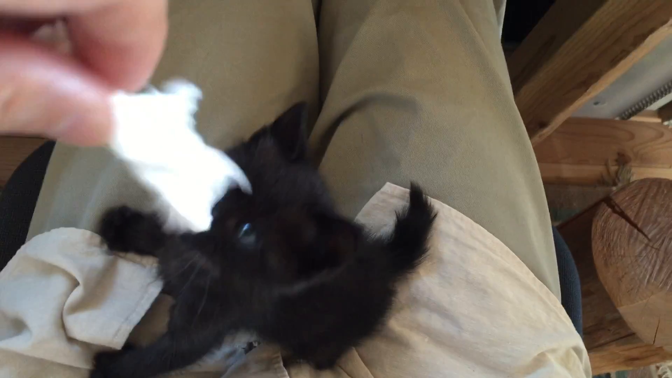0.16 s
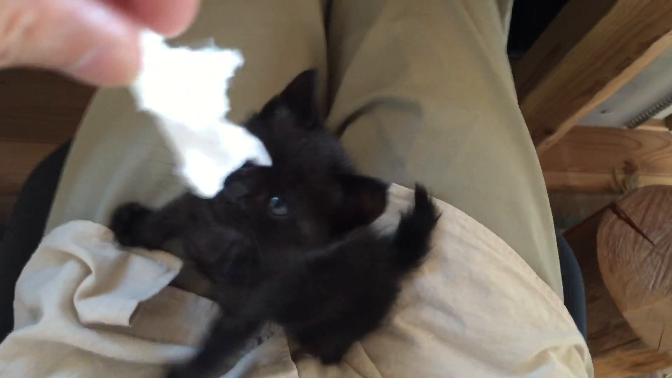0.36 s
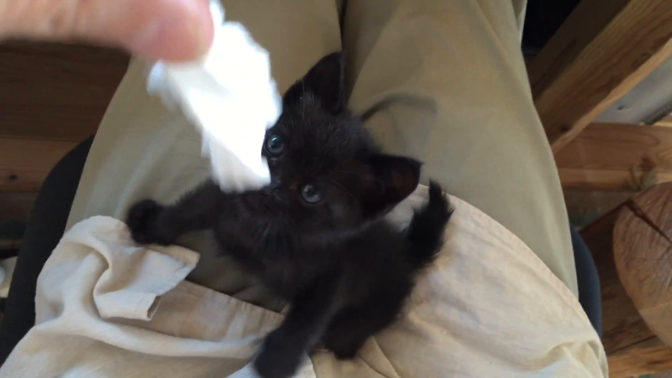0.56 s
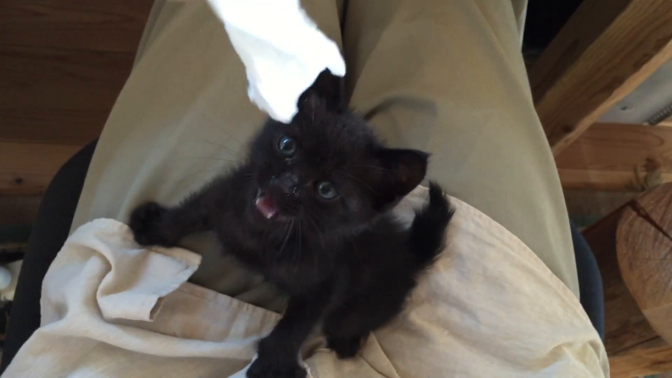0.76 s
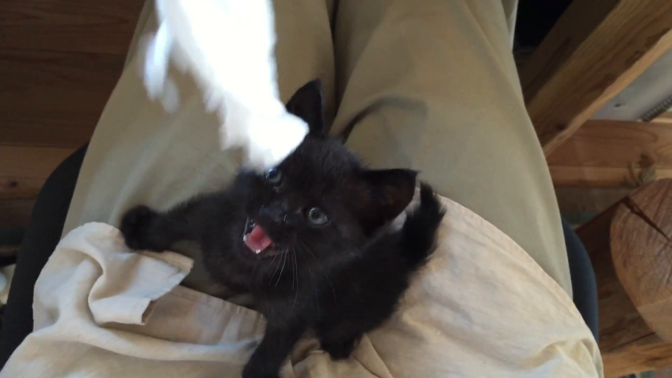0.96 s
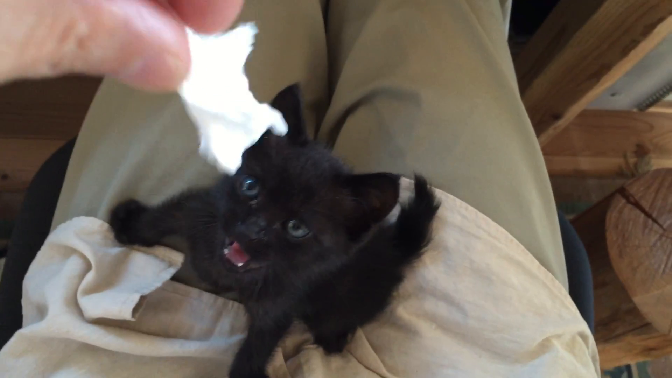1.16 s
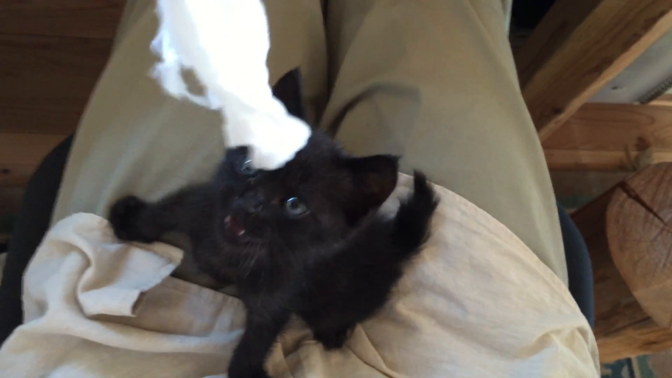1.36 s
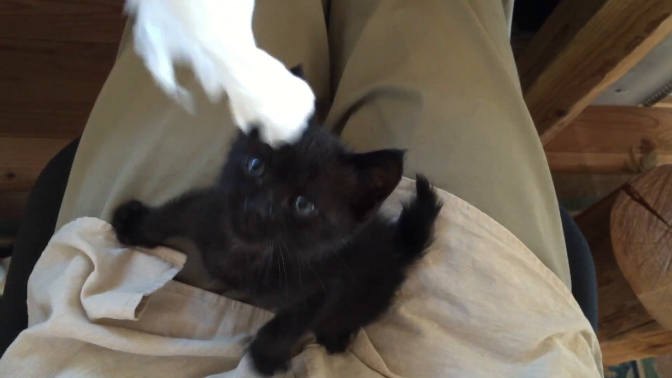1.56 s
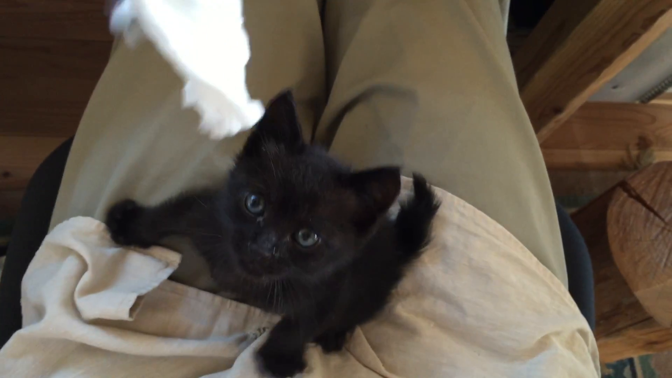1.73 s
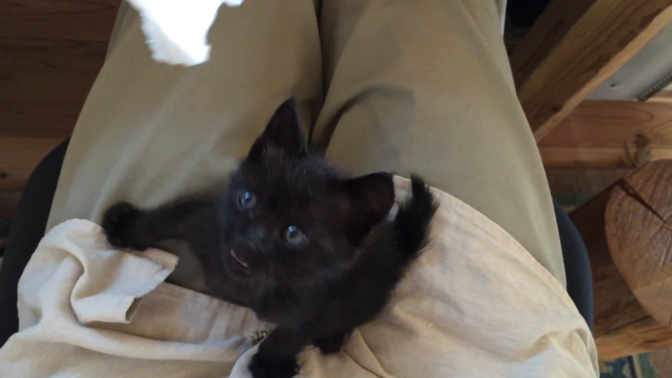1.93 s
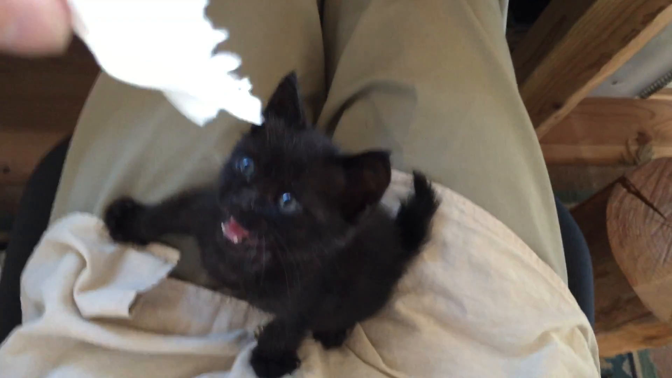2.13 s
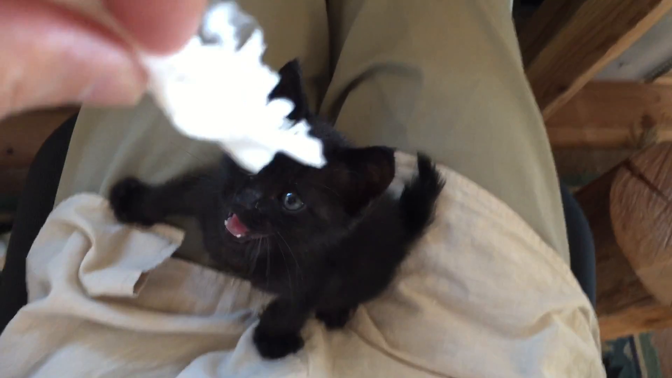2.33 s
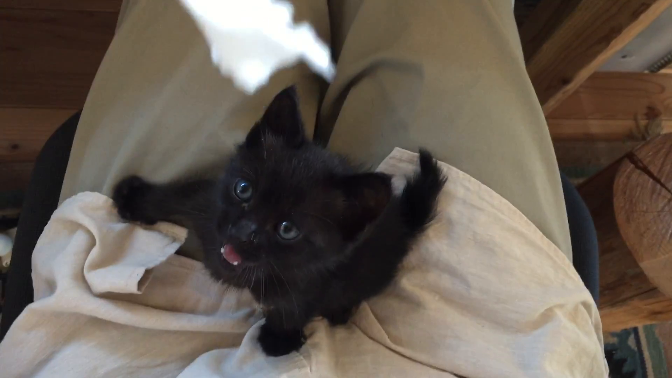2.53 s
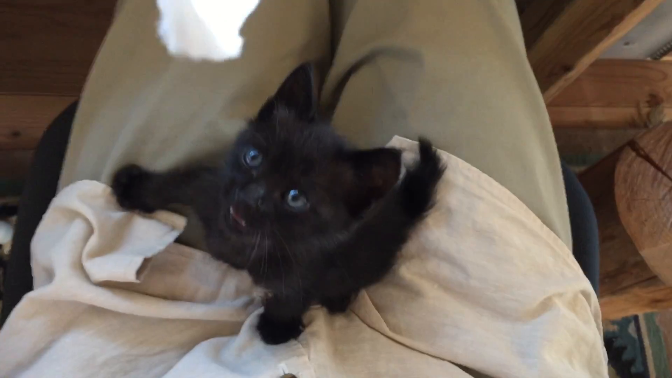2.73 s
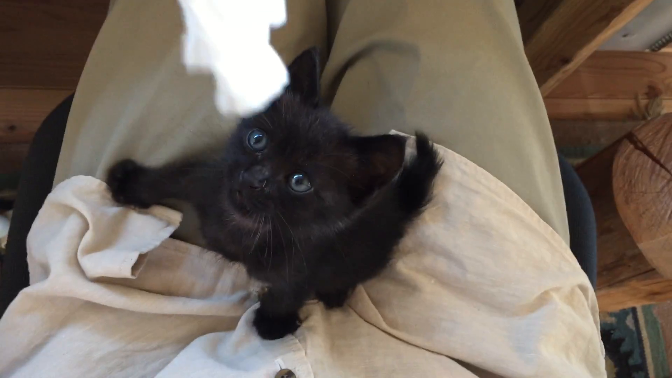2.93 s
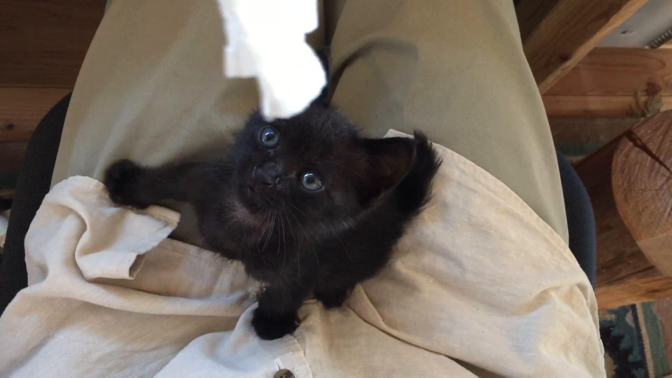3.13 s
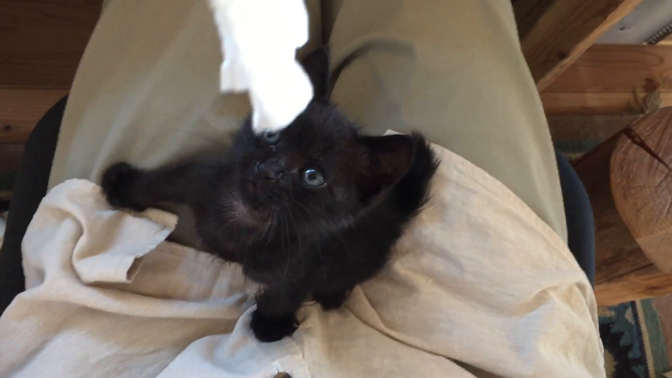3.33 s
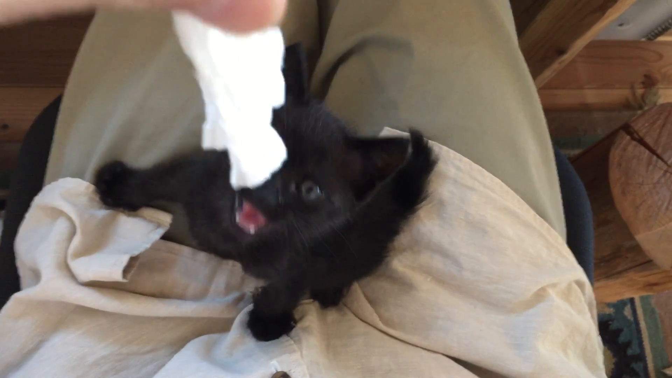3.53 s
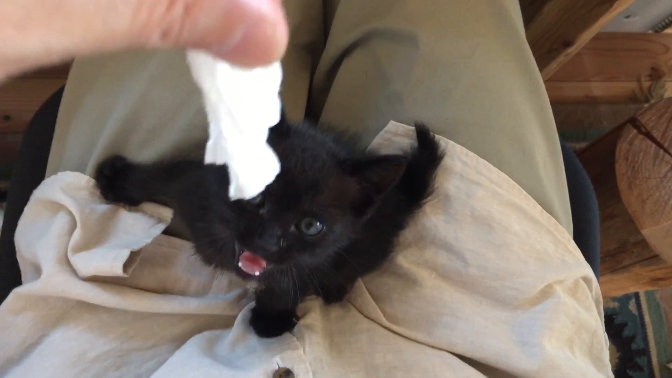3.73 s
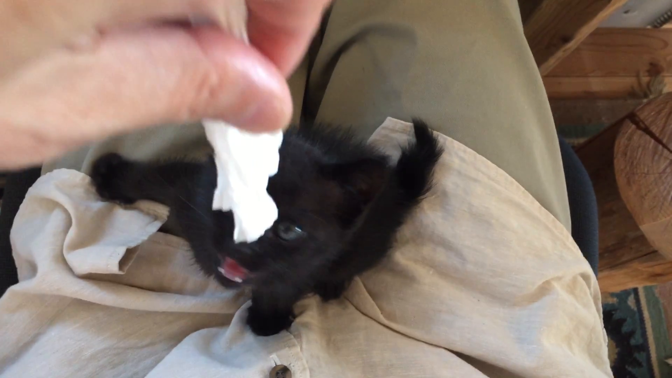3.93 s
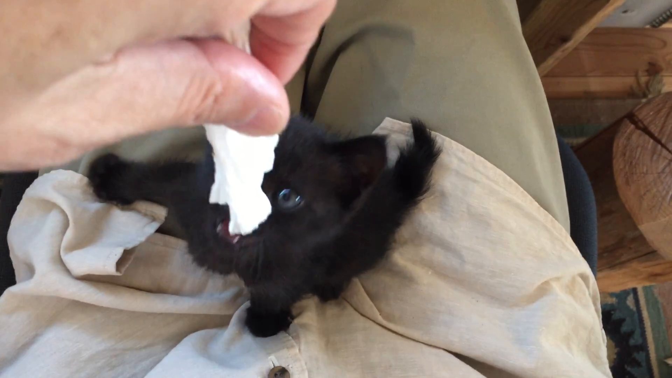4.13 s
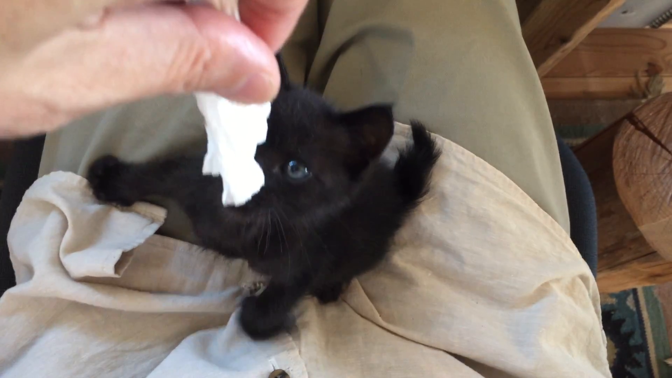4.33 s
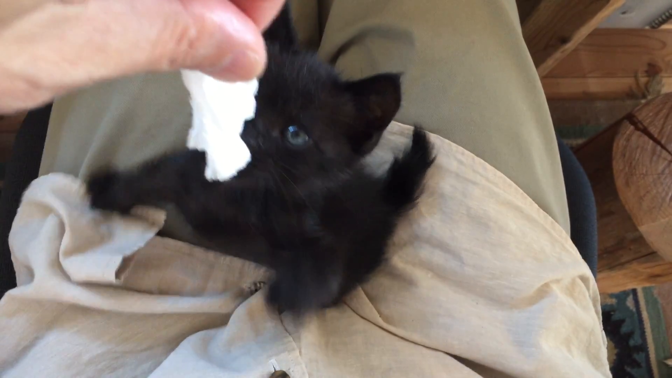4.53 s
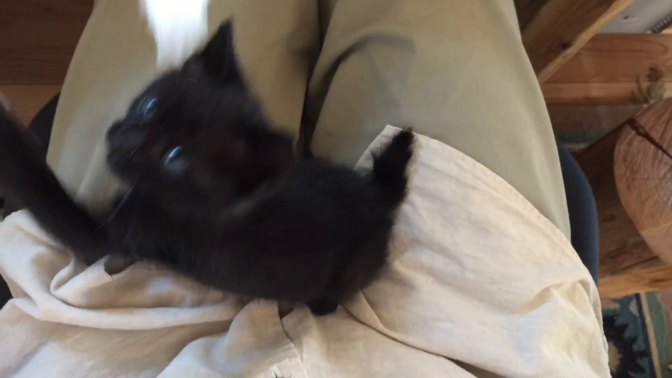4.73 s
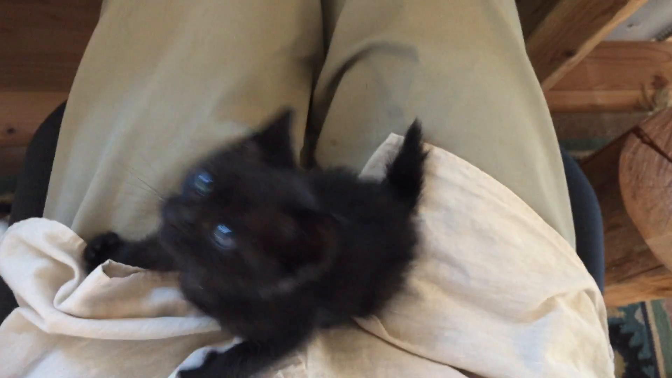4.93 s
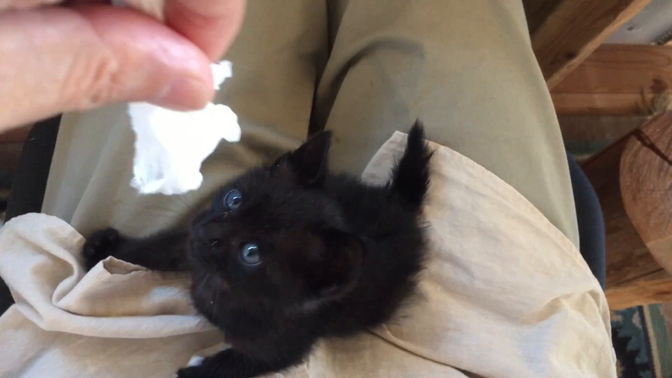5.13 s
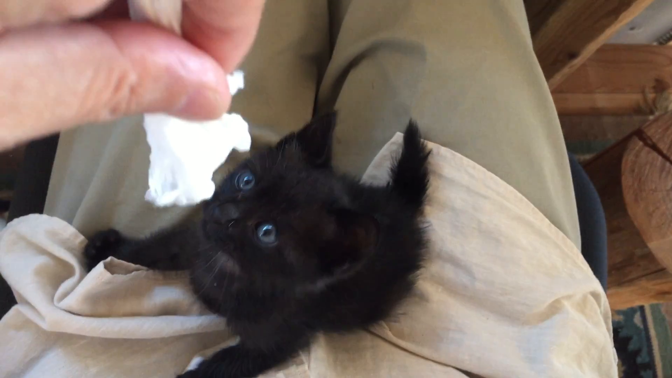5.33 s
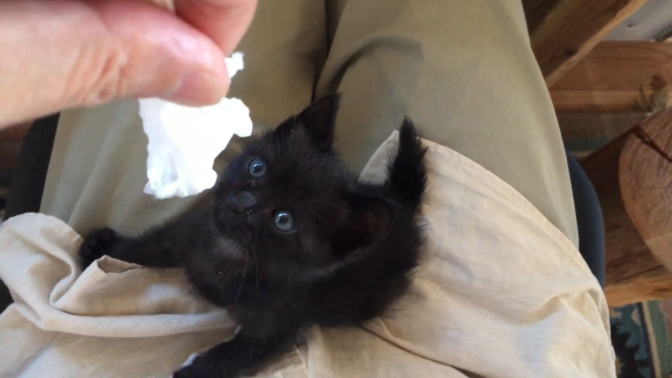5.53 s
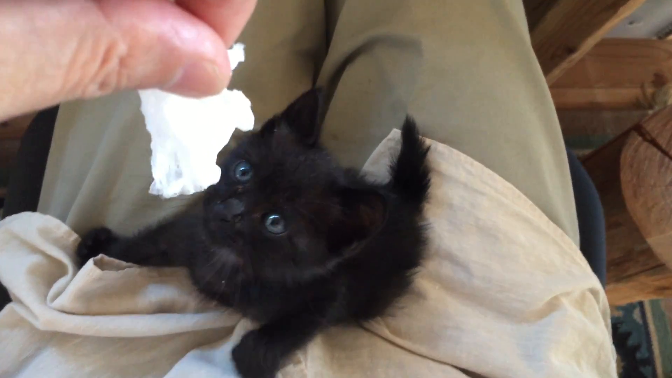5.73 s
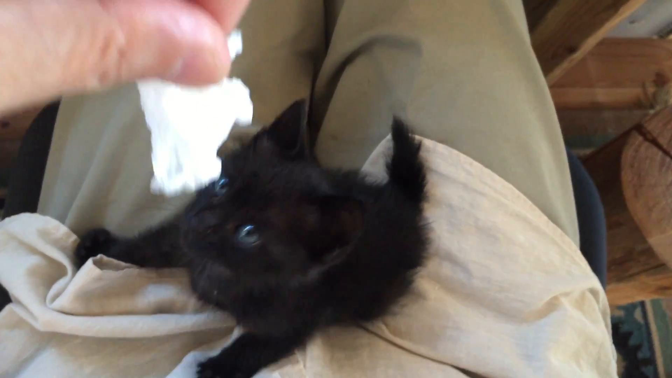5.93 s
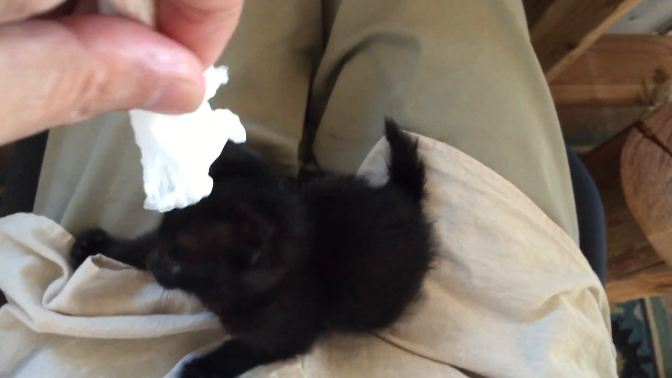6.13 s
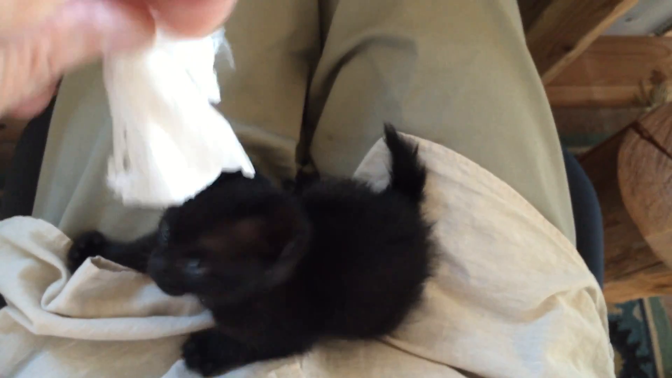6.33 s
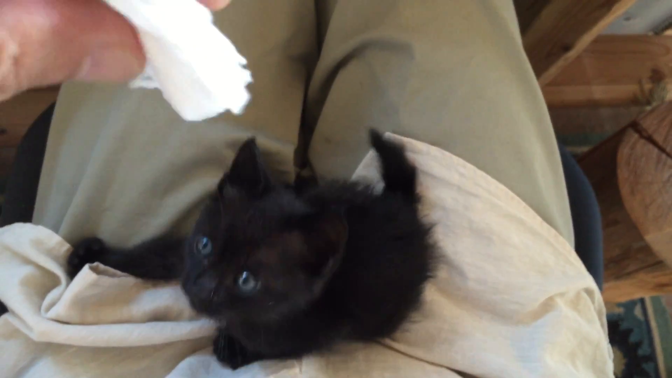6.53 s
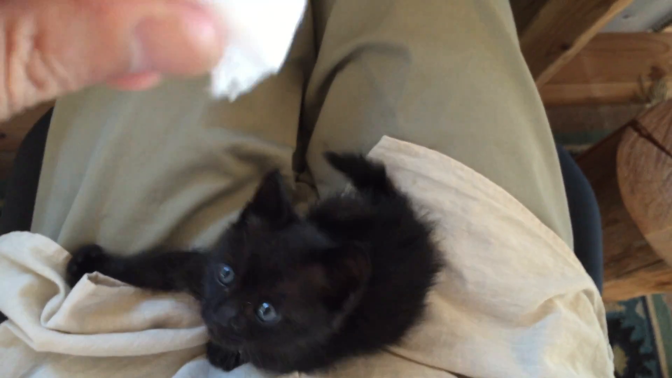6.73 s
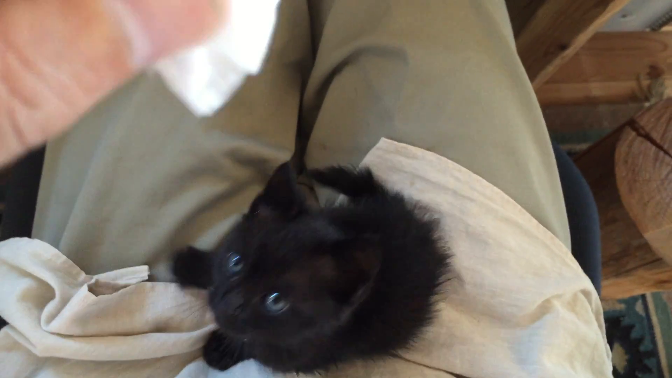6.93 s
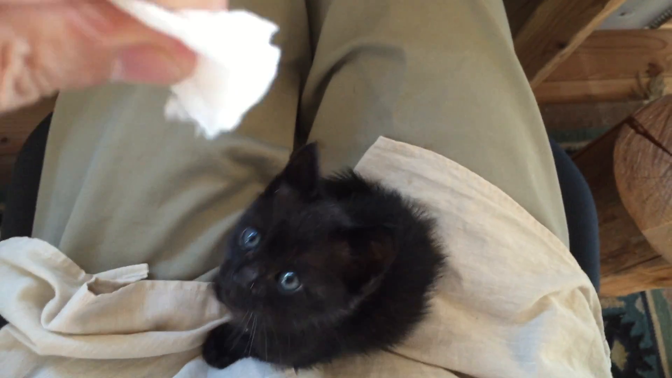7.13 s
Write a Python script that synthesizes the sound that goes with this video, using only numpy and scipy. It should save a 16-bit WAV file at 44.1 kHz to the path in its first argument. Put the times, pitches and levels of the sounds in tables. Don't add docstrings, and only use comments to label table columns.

```python
import sys
import numpy as np
from scipy import signal
from scipy.fft import rfft, irfft
from scipy.io import wavfile
from scipy.ndimage import uniform_filter1d, minimum_filter1d

SR = 44100
rng = np.random.default_rng(int(sys.argv[2]) if len(sys.argv) > 2 else 0)


def pcm_store(signal):
    levels = np.round(np.clip(np.atleast_2d(signal), -1, 1) * 32767)
    wavfile.write(sys.argv[1], SR, levels.astype(np.int16).T)


def voltage_ratio(decibels):
    exponent = np.asarray(decibels, float) / 20
    return 10 ** exponent


N = 320607

# time in seconds, effort in dB, pitch in Hz, mouth opening 0-1, brightness in dB.
FIRST_MEW = [
    (0.8, -53, 641, 0, -29),
    (0.832, -37.5, 694, 0.35, -6.5),
    (0.874, -37, 665.7, 0.45, -6.5),
    (1.063, -37.5, 773.4, 1, -1.5),
    (1.127, -34.5, 773.3, 0.77, -6.5),
    (1.2, -37, 801, 0.71, -5.5),
    (1.358, -40, 699, 0.15, -6),
    (1.386, -46, 650, 0, -5.5),
    (1.423, -49.5, 537, 0.01, -10),
]
SECOND_MEW = [
    (2.119, -43, 719, 0.38, -8),
    (2.176, -46, 629, 0.19, -13),
    (2.251, -42.5, 630.3, 0.76, -9.5),
    (2.361, -39, 699, 1, -5.5),
    (2.46, -36.5, 718, 1, -7),
    (2.5, -39, 718, 0.99, -5.5),
    (2.608, -38, 765, 0.78, -12),
    (2.701, -42, 733, 0.0063, -5),
    (2.746, -55.5, 588, 0, -5),
]
THIRD_MEW = [
    (3.594, -37, 890, 0.26, -10),
    (3.625, -30.5, 1016, 0.88, -10),
    (3.659, -30, 1005, 1, -10),
    (3.704, -28.5, 1134, 1, -8),
    (3.954, -28, 1106, 0.774, -12.5),
    (4.049, -32, 1060, 0.94, -10.5),
    (4.125, -28.5, 902, 0.59, -12.5),
    (4.211, -38.5, 706, 0.26, -7),
    (4.259, -47.5, 551, 0.087, -10),
]
# middle in seconds, length in seconds, half-pitch lines in dB, rasp in dB.
VOICE_BREAKS = [(0.815, 0.028, -4, 0), (0.836, .026, 3, -7), (0.856, 0.054, -35, -24),
                (1.05, .03, -31, -31), (1.168, 0.35, -47.5, -22.5), (1.182, 0.024, -27, -21),
                (1.257, 0.032, -34, -30), (1.397, .03, -13, -19), (2.129, 0.019, 13, -5),
                (2.332, 0.043, -38, -16.5), (2.43, 0.039, -32, -16.5), (2.615, .06, -30, -17),
                (2.675, 0.047, -23, -18), (2.745, 0.044, -25, -12), (3.593, 0.026, 4, -2),
                (3.667, 0.011, -17, -16), (3.703, 0.01, -10, -2), (3.742, 0.034, -38, -18),
                (3.862, .3, -23.5, -41), (4.121, 0.049, -25, -28.5), (4.259, 0.027, -5, -8)]
# fundamental in dB, second harmonic in dB, nasal notch in Hz,
# top resonance in Hz, cheek notch in Hz, shrill peak in dB.
REGISTERS = [
    (8.5, -3.5, 2904, 9620, 8240, -10),
    (-2, -4, 3110, 8500, 7900, -5),
    (12, 4, 2820, 8530, 8790, 9),
]
QUIVER_CRESTS = [1.06, 2.376, 3.778]
RASP_DB = [-29, -30.5, -25]
LOW_RESONANCE_DB = [-9, -8, -9]
WIDTHS_HZ = [495, 650, 807, 1500]
# frequency in Hz, level in dB.
VOICE_TONE = [(400, -12), (700, -4), (1100, -8), (1600, -9), (2800, -4.5), (4500, -1), (7600, -8),
              (11000, -8), (13000, -14.5), (16000, -13.5)]
# frequency in Hz, level in dB.
BREATH_TONE = [(1000, -26), (3200, -24), (4300, -4), (5100, -8), (6000, 2), (9000, 8), (15000, 6)]
# start in seconds, peak in dB, ring in Hz, T60 in seconds.
TICKS = [(0.571, -63, 942, 0.011), (0.787, -48.5, 2240, 0.027), (1.428, -46.5, 5770, 0.014),
         (2.75, -61, 5860, 0.015), (2.895, -53, 4450, 0.017), (3.002, -63, 4600, 0.017),
         (4.605, -51, 970, 0.0097), (4.703, -48.5, 2130, 0.026), (4.74, -55, 1810, 0.011),
         (5.101, -58, 1205, 0.016), (5.135, -63, 2060, 0.016), (6.127, -48.5, 3480, 0.0054),
         (6.171, -61, 893, 0.014), (6.23, -64, 980, 0.026), (6.623, -61, 1030, 0.013),
         (6.994, -58, 904, 0.014)]
# start in seconds, rms in dB, length in seconds, centre in Hz,
# width in octaves.
PUFFS = [(2.094, -59.5, 0.17, 14000, 2), (2.728, -68.5, 0.084, 6000, 1.8), (2.858, -72, 0.071, 9140, 1.5),
         (3.003, -73.5, 0.039, 4500, 0.66), (4.237, -66.5, 0.13, 4120, 0.12),
         (4.622, -74, 0.17, 2950, 1.26), (4.709, -55, 0.039, 1500, 1.53), (5.076, -72.5, 0.06, 1500, 0.58),
         (6.499, -73.5, 0.14, 2880, 0.27)]
# start in seconds, rms in dB, length in seconds.
FUR = [(5.341, -81.5, .18), (5.439, -77, 0.092), (5.518, -74.5, 0.13), (5.63, -73, 0.084),
       (5.743, -76, 0.084), (6.274, -60.5, 0.059)]
# start in seconds, rms in dB, length in seconds, centre in Hz.
CLAWS = [(6.36, -64.5, 0.039, 6900), (6.474, -57, 0.054, 5540), (6.55, -66, 0.078, 11000),
         (6.689, -69, 0.17, 7960), (6.731, -56.5, 0.058, 10040), (6.777, -57.5, 0.062, 9000),
         (6.828, -54.5, 0.023, 9200), (6.855, -52, 0.026, 10220), (6.881, -57, 0.025, 11000),
         (7.033, -66, 0.068, 10000), (7.089, -70.5, 0.091, 8000), (7.13, -69, 0.05, 11000),
         (7.218, -65.5, 0.12, 8800)]
# start in seconds, length in
# seconds, from Hz, to Hz, rms in dB.
DRONES = [(0, 7.27, 70, 63, -79), (.2, 0.49, 138, 125, -74), (.81, 0.077, 340, 385, -70),
          (1.05, 0.24, 140, 120, -62), (2.11, 0.043, 480, 270, -66), (3.55, .2, 200, 235, -74),
          (3.95, 0.25, 130, 142, -63), (4.71, 0.034, 235, 364, -57), (5.5, 0.58, 222, 213, -70),
          (5.6, .2, 660, 720, -85), (6.15, 0.48, 355, 361, -78), (6.3, 0.45, 150, 230, -73),
          (6.4, 0.46, 996, 1042, -78), (6.4, 0.75, 880, 930, -83), (6.55, 0.75, 230, 250, -72),
          (6.7, 0.56, 530, 530, -82), (6.96, 0.07, 510, 540, -67), (1.405, .04, 600, 530, -74),
          (3.59, .03, 430, 400, -66)]
# frequency in Hz, density in dB per Hz.
HUSH_TONE = [(18, -44.5), (30, -15), (53, -2), (137, -5), (203, -8), (318, -13.5), (392, -20), (816, -22),
             (1060, -20), (1310, -26), (1420, -23.5), (1700, -26), (4860, -30), (5830, -29.5), (15800, -39)]
# time in seconds, lift over the hush in dB.
HUSH_SWELL = [(0, 0), (2.0, -1), (2.8, 0), (3.5, -1), (4.3, -1), (4.65, 1), (5.4, 0), (6.0, 0), (6.55, 3),
              (6.85, 3.5), (7.0, 1), (7.27, 5)]
# frequency in Hz, T60 in seconds.
ROOM_DECAY = [(300, 0.17), (2000, 0.35), (5000, 0.315), (12000, 0.083)]
# frequency in Hz, width in Hz, level in dB.
SHADOWS = [(4997, 360, -8), (7530, 1940, -2.5), (10400, 470, -6)]
# frequency in Hz, threshold in dB.
MASKING = [(2300, -29), (3300, -30), (3900, -38), (5000, -30), (5800, -38), (11800, -34), (13000, -16)]
WIDE_MOMENTS = [.378, .745, .93, 1.66, 1.82, 2.467, 2.7, 3.14, 3.325, 3.51, 4.116, 4.93, 5.69]

# (Hz, Hz)
LOW, MIDDLE, UPPER = (1902, 122), (3396, 1540), (5430, 620)
LOW_PER_SOFT_DB, UPPER_DB = 0.7, -1
FLIP_S, PITCH_BEFORE_FLIP = 3.703, 0.925
QUIVER_HZ, QUIVER_SHARE = 13, 0.0045
GUST_DB, SHIMMER_DB = 2.5, 1.6
THIN_DB_PER_OCTAVE = (16, 9)
FUR_HZ, FUR_OCTAVES, CLAW_OCTAVES = 4920, 0.29, 0.81
HUSH_DB, ROOM_DB = -66.5, -21
RUMBLE_DB, RUMBLE_SHARE = -2, 0.57
EDGE_HZ = 15760
WIDE_HZ = (6300, 12500)


def evened(x):
    return x / np.sqrt(np.mean(x ** 2) + 1e-20)


def smoothed(x, width):
    return uniform_filter1d(uniform_filter1d(x, width, axis=0), width, axis=0)


def wander(count, width):
    return evened(smoothed(rng.standard_normal(count), width))


def read(points, hz):
    f, value = np.transpose(points)
    return np.interp(np.log(hz + 1), np.log(f + 1), value)


def shaped_noise(gain, size, count):
    a, b = rng.standard_normal(gain.T.shape + (2,)).T
    return signal.istft(gain * (a + 1j * b), nperseg=size, noverlap=size * 3 // 4)[1][:count]


def mew(rows, crest, rasp_db, low_db, first_db, second_db, *shape):
    s, effort_db, pitch = np.transpose(rows)[:3]
    t = np.arange(s[0], s[-1], 1 / SR)
    before_flip = (t < FLIP_S) & (s[-1] > FLIP_S)
    hz = uniform_filter1d(np.interp(t, s, pitch), 700)
    hz = uniform_filter1d(hz * np.where(before_flip, PITCH_BEFORE_FLIP, 1), 300)

    tremor = wander(len(t), 500)
    gusts = wander(len(t), 350)
    rasp = voltage_ratio(rasp_db + GUST_DB * gusts) + voice_breaks(t, 3)
    jitter = wander(len(t), 30)
    quiver = QUIVER_SHARE * np.cos(2 * np.pi * QUIVER_HZ * (t - crest))
    turns = np.cumsum(hz * (1 + 0.00211 * tremor + quiver)) / SR
    turns = turns + (0.0011 + 0.023 * rasp) * jitter

    order = np.arange(1, 61)[:, None] / 2
    coarse_t, coarse_hz = t[::32], hz[::32]
    partial_hz = order * coarse_hz
    lines = throat(partial_hz, rows, coarse_t, low_db, *shape) * (partial_hz < 16000)
    lines[::2] *= voice_breaks(coarse_t, 2)
    lines[[1, 3]] *= voltage_ratio(np.array([[first_db], [second_db]]))
    lines[1] *= voltage_ratio(0.6 * np.interp(coarse_t, s, effort_db - effort_db.max()))
    lines[[1, 3]] *= voltage_ratio(np.outer(THIN_DB_PER_OCTAVE, np.log2(coarse_hz / hz.max())))
    drift = evened(smoothed(rng.standard_normal(lines.T.shape), 60).T)
    lines *= voltage_ratio(SHIMMER_DB * drift * np.minimum(order / 6, 1.6))
    lines /= np.sqrt((abs(lines) ** 2).sum(0) / 2)
    lines = np.repeat(lines, 32, axis=1)[:, :len(t)]
    voiced = -(lines * np.exp(2j * np.pi * order * turns)).real.sum(0)

    frames = s[0] + np.arange(len(t) // 64 + 5) * 64 / SR
    bins = np.fft.rfftfreq(256, 1 / SR)[:, None]
    colour = abs(throat(bins, rows, frames, low_db, *shape)) * voltage_ratio(read(BREATH_TONE, bins))
    air = evened(shaped_noise(colour / np.linalg.norm(colour, axis=0), size=256, count=len(t)))
    pulses = 1 + 0.3 * np.cos(2 * np.pi * turns)

    edges = np.clip(np.minimum((t - s[0]) / 0.003, (s[-1] - t) / 0.0087), 0, 1)
    sound = (voiced + rasp * pulses * air) / np.sqrt(1 + rasp ** 2)
    return voltage_ratio(np.interp(t, s, effort_db)) * edges * sound


def voice_breaks(t, column):
    total = 0
    for row in VOICE_BREAKS:
        middle, length = row[:2]
        total = total + voltage_ratio(row[column]) * np.cos(np.pi * np.clip((t - middle) / length, -.5, .5)) ** 2
    return total


def throat(hz, rows, t, low_db, nose_hz, top_hz, cheek_hz, shrill_db):
    times = np.transpose(rows)[0]
    _, effort_db, _, mouth, bright_db = (np.interp(t, times, c) for c in np.transpose(rows))
    low, middle, upper = (shut + rise * mouth for shut, rise in (LOW, MIDDLE, UPPER))
    low_db = low_db + LOW_PER_SOFT_DB * (np.max(rows, axis=0)[1] - effort_db)
    source = voltage_ratio(read(VOICE_TONE, hz) + shrill_db / (1 + ((hz - 12600) / 2400) ** 4))
    source = source * notch(hz, nose_hz, width_hz=520, left=0.2)
    source = source * notch(hz, cheek_hz, width_hz=580, left=0.36)
    centres = (low, middle, upper, top_hz)
    levels_db = (low_db, 0 * t, UPPER_DB, bright_db)
    response = 0
    for k, (f, db, width) in enumerate(zip(centres, levels_db, WIDTHS_HZ)):
        response = response + (-1) ** k * voltage_ratio(db) / (1 + 2j * (hz - f) / width)
    return source * response


def notch(hz, centre_hz, width_hz, left):
    return 1 - (1 - left) / (1 + 2j * (hz - centre_hz) / width_hz)


def tick(db, hz, t60):
    t = np.arange(round(0.05 * SR)) / SR
    ring = np.sin(2 * np.pi * hz * t) + 0.59 * np.sin(2 * np.pi * 0.558 * hz * t)
    snap = 0.33 * uniform_filter1d(rng.standard_normal(len(t)), size=3)
    attack = 1 - np.exp(-t / 0.00011)
    return voltage_ratio(db - 60 * t / max(t60, 0.003)) * (ring + snap) * attack


def rub(db, length, centre_hz, octaves):
    count = round(length * SR)
    grains = rng.standard_normal(8192) * voltage_ratio(2.2 * rng.exponential(1, 8192))
    hz = np.fft.rfftfreq(8192, 1 / SR) + 1
    hump = np.exp(-0.5 * (np.log2(hz / centre_hz) / octaves) ** 2)
    body = 0.29 * np.exp(-0.5 * (np.log2(hz / 1800) / 1.7) ** 2)
    lumps = voltage_ratio(2.1 * evened(uniform_filter1d(rng.standard_normal(8192), 90)))
    texture = irfft(rfft(grains) * (hump + body)) * lumps
    swell = np.sin(np.pi * np.linspace(0, 1, count) ** 0.64) ** 2
    return voltage_ratio(db + 3.0) * evened(texture[:count]) * swell


def room(x):
    taps = np.zeros(SR // 2)
    at = np.arange(200, SR // 2 - 20, 20)
    taps[at + rng.integers(0, 20, len(at))] = rng.choice([-1., 1.], len(at))
    hz, t, z = signal.stft(taps, SR, nperseg=256)
    decay = voltage_ratio(-60 * t / read(ROOM_DECAY, hz)[:, None])
    tail = signal.istft(z * decay, SR, nperseg=256)[1]
    return signal.fftconvolve(x, tail / np.linalg.norm(tail))[:N]


def drone(length, from_hz, to_hz, db):
    count = round(length * SR)
    waver = wander(N, 900)[:count]
    turns = np.cumsum(np.linspace(from_hz, to_hz, count)) / SR
    tone = np.sqrt(2) * np.sin(2 * np.pi * turns)
    return voltage_ratio(db + 3.0 * waver) * tone * signal.windows.tukey(count, 0.7)


def hush():
    hz = np.fft.rfftfreq(4096, 1 / SR)[:, None]
    t = np.arange(N // 1024 + 5) * 1024 / SR
    swell_db = np.interp(t, *np.transpose(HUSH_SWELL))
    high = 1 / (1 + (400 / (hz + 1)) ** 2)
    patches = uniform_filter1d(rng.standard_normal((len(t), len(hz))), size=3, axis=0)
    patches = evened(uniform_filter1d(patches, size=16, axis=1)).T
    still = voltage_ratio(read(HUSH_TONE, hz)) / (1 + (34 / (hz + 1)) ** 6)
    rumble_db = RUMBLE_DB + RUMBLE_SHARE * swell_db
    lift = voltage_ratio((1 - high) * rumble_db + high * swell_db + 0.616 * patches)
    return voltage_ratio(HUSH_DB) * evened(shaped_noise(still * lift, size=4096, count=N))


def add(mix, s, sound):
    part = mix[round(s * SR):][:len(sound)]
    part += sound[:len(part)]


def scene():
    near, far = np.zeros(N), hush()
    mews = (FIRST_MEW, SECOND_MEW, THIRD_MEW)
    for rows, crest, rasp_db, low_db, register in zip(mews, QUIVER_CRESTS, RASP_DB, LOW_RESONANCE_DB, REGISTERS):
        add(near, rows[0][0], mew(rows, crest, rasp_db, low_db, *register))
    for s, *snap in TICKS:
        add(near, s, tick(*snap))
    for s, *puff in PUFFS:
        add(near, s, rub(*puff))
    for s, db, length in FUR:
        add(near, s, rub(db, length, FUR_HZ, FUR_OCTAVES))
    for s, *scrape in CLAWS:
        add(near, s, rub(*scrape, CLAW_OCTAVES))
    for s, *tone in DRONES:
        add(far, s, drone(*tone))
    mono = near + voltage_ratio(ROOM_DB) * room(near) + far
    return np.array([mono, mono])


def roll_off(x):
    return signal.sosfilt(signal.butter(12, 16220, fs=SR, output="sos"), x)


def record(dry):
    hz, t, z = signal.stft(dry, SR, nperseg=1024)
    shade_db = sum(db / (1 + (2 * (hz - f) / w) ** 2) for f, w, db in SHADOWS)
    z = z * (voltage_ratio(shade_db) * (hz < EDGE_HZ))[:, None]
    nearby = -minimum_filter1d(-abs(z), size=25, axis=1)
    audible = abs(z) > voltage_ratio(read(MASKING, hz))[:, None] * nearby
    z = z * (audible | (hz < 2300)[:, None])
    for s in WIDE_MOMENTS:
        band = np.ix_([0, 1], (hz > WIDE_HZ[0]) & (hz < WIDE_HZ[1]), abs(t - s) < 0.014)
        level = np.sqrt(uniform_filter1d(abs(z[band]) ** 2, size=24, axis=1))
        z[band] = 1.45 * level * np.exp(2j * np.pi * rng.random(level.shape))
    mix = signal.istft(z, SR, nperseg=1024)[1][:, :N]
    return roll_off(mix)


dry = scene()
out = record(dry)
pcm_store(out)
```